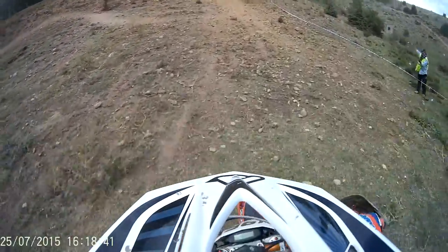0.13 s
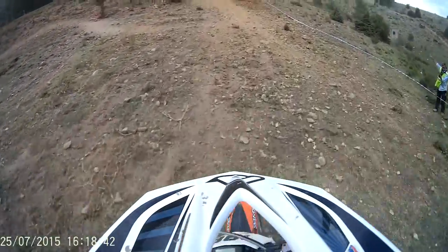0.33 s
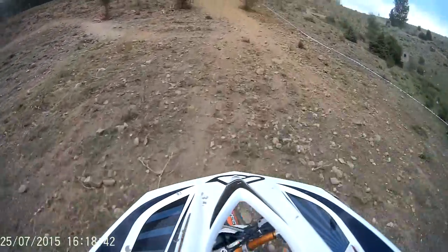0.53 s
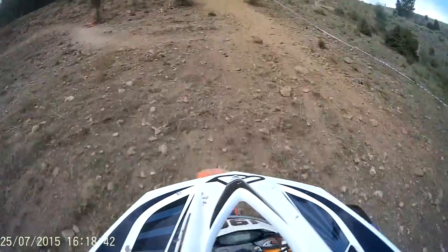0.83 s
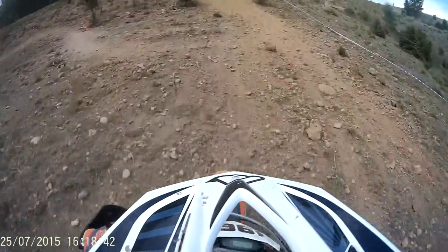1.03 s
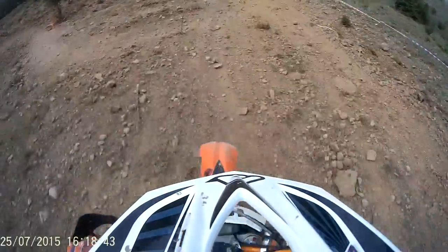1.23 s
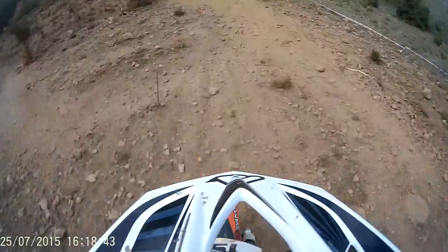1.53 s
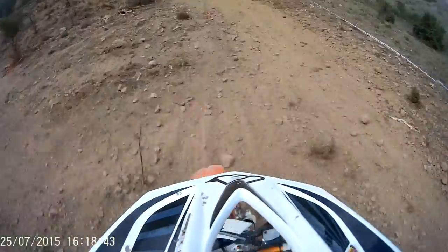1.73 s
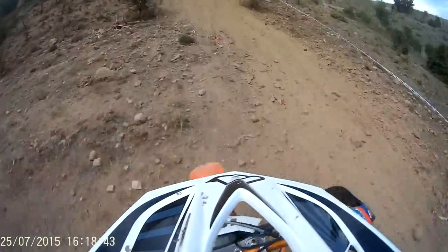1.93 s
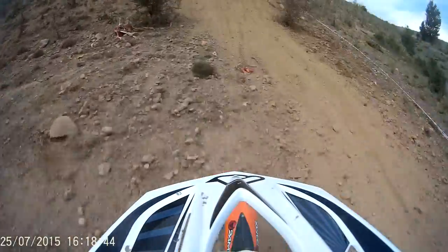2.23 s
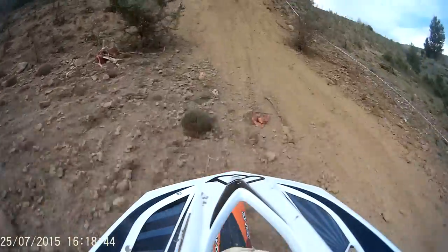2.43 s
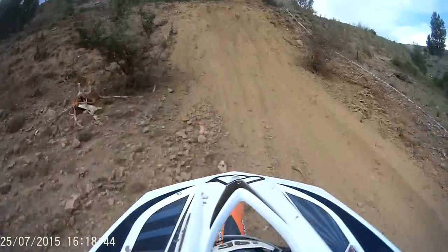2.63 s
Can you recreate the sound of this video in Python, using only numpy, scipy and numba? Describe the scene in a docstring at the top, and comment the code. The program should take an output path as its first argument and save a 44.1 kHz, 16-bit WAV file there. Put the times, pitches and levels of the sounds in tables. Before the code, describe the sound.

Two-stroke motorcycle engine buzzing low, blipping, sagging, then climbing to a loud, raspy, muffled roar

```python
"""A two-stroke enduro motorcycle drones from the first instant, then climbs a steep dirt slope in bursts of
throttle, heard from the rider's helmet. Each firing is an impulse that rings a low boom and a higher bark
in the exhaust; with the throttle shut the firings turn weak and uneven and a low burble comes forward.
Noise pulsing once a turn gives the clatter of piston and chain, and decaying sines the two chassis clacks
over stones. The muffled microphone clips the loudest peaks into a rasp."""
import sys
import numpy as np
from scipy import signal
from scipy.fft import rfft, irfft
from scipy.io import wavfile
from scipy.ndimage import uniform_filter1d
from numba import njit

SR = 44100
rng = np.random.default_rng(int(sys.argv[2]) if len(sys.argv) > 2 else 0)


def wav_out(sig):
    """Save sig, one row per channel (or a flat mono array), as 16-bit PCM at SR to the path in sys.argv[1]."""
    wavfile.write(sys.argv[1], SR, np.round(np.clip(np.atleast_2d(sig).T, -1, 1) * 32767).astype(np.int16))


N = 123479  # length in samples

# Engine speed. Each row: time in seconds, firings per second.
ENGINE_SPEED = [(0.0, 68.3), (0.035, 72.7), (0.08, 69.0), (0.26, 70.6), (0.33, 85.5), (0.44, 78.3),
                (0.49, 85.1), (0.54, 84.4), (0.61, 108.0), (0.665, 94.6), (0.73, 102.2), (0.8, 90.5),
                (0.87, 85.7), (0.95, 88.7), (1.08, 87.6), (1.15, 91.5), (1.2, 95.9), (1.25, 89.6),
                (1.32, 82.5), (1.4, 83.7), (1.45, 88.7), (1.52, 111.5), (1.57, 114.1), (1.63, 130.4),
                (1.685, 117.8), (1.76, 127.6), (1.81, 125.9), (1.9, 109.7), (2.0, 96.9), (2.09, 83.6),
                (2.15, 94.4), (2.22, 114.1), (2.28, 111.2), (2.34, 108.4), (2.4, 114.0), (2.45, 113.2),
                (2.49, 118.8), (2.54, 119.4), (2.58, 129.9), (2.66, 134.9), (2.71, 148.9), (2.8, 152.4)]
# Strength of the exhaust resonances under load. Each row: time in seconds, boom in dB, bark in dB.
EXHAUST_LOAD = [(0, -19, -19.5), (0.05, -20, -26.5), (0.1, -16.5, -24.5), (0.27, -20, -24),
                (0.33, -20.5, -19.5), (0.42, -19, -18.5), (0.46, -15, -19), (0.54, -12, -16.5),
                (0.6, -8, -12.5), (0.63, -27.5, -9.5), (0.7, -20, -15), (0.81, -23, -21), (0.9, -19.5, -21),
                (1.1, -19.5, -19.5), (1.19, -22, -16), (1.24, -24.5, -21), (1.3, -21, -21.5),
                (1.4, -19.5, -22), (1.45, -17, -13.5), (1.5, -8.5, -8.5), (1.56, -12, -8), (1.61, -15, -11),
                (1.68, -12.5, -8.5), (1.78, -10, -6), (1.82, -21, -15.5), (2.06, -18, -22.5),
                (2.1, -22, -17), (2.2, -18.5, -13.5), (2.31, -19, -12), (2.37, -7, -11),
                (2.52, -6.5, -10.5), (2.58, -11, -3), (2.67, -12, -7), (2.73, -9, -5.5), (2.79, -7.5, -3.5)]
# Centres of the exhaust resonances. Each row: time in seconds, boom in Hz, bark in Hz.
EXHAUST_CENTRES = [(0, 282.4, 634), (.22, 268.5, 659), (.36, 252, 592), (.45, 315, 630), (.54, 279, 635),
                   (.62, 291, 580), (.9, 264, 610), (1.1, 241, 595), (1.2, 295, 640), (1.4, 258, 610),
                   (1.48, 287, 623), (1.54, 291.4, 548), (1.65, 255, 568), (1.78, 263, 565),
                   (2.14, 267, 571), (2.27, 244.5, 525), (2.36, 298, 596), (2.52, 322.5, 530),
                   (2.58, 281, 527), (2.8, 278, 585)]
# Spells of weak firing; overlapping drops add. Each row: start in seconds, end in seconds, change in dB.
WEAK_SPELLS = [(0.706, 0.781, 0), (.776, 0.82, -7), (0.854, 0.871, -12), (1.246, 1.279, -11),
               (1.314, 1.33, -9.5), (1.347, 1.37, -4), (1.81, 2.024, -8.5), (2.002, 2.09, -3.5)]
# Knocks on the chassis. Each row: time in seconds, relative level in dB.
CHASSIS_KNOCKS = [(.404, -20), (.4135, -4), (.426, -12), (.434, -14), (.7823, 0), (.789, -6), (.797, -9)]
# Modes of the chassis. Each row: frequency in Hz, relative level in dB, time to decay by 60 dB in seconds.
CHASSIS_MODES = [(1523, 0, .05), (1766, -6, .04), (2046, -3, .04), (2401, -1, .045), (2580, -6, .035),
                 (3451, -15, .035), (3828, -19, .04)]
# Spectrum of unburnt gas and shaking parts. Each row: frequency in Hz, relative density in dB.
BURBLE_SPECTRUM = [(20, -26), (55, -14.5), (100, -7.5), (160, -3), (280, -4.5), (420, -8), (630, -13.5),
                   (780, -11), (1000, -27.5), (1500, -64), (20000, -100)]
# Spectrum of piston and chain. Each row: frequency in Hz, relative density in dB.
CLATTER_SPECTRUM = [(20, -30.5), (700, -28.5), (1000, -39), (1150, 2), (1400, 3), (1700, -5.5), (2050, -4),
                    (2600, -18.5), (3200, -24), (5000, -32.5), (6500, -35.5), (20000, -53.5)]
# Frequencies that the silencer holds back. Each row: centre in Hz, width in Hz.
SILENCER_DELAYS = [(611, 450), (514, 561)]
# Weak overtones of the silencer. Each row: frequency in Hz, width in Hz, level in dB.
SILENCER_OVERTONES = [(821, 140, -38.5), (1380, 110, -58.5)]

START_TURN = .75  # position in the engine's turn at the outset
# Timing and level scatter of firings at EVEN_HZ firings per second; it shrinks as the speed rises
JITTER_S, SCATTER_DB, EVEN_HZ = .00006, .7, 90
WEAK_UNEVENNESS = 5.5  # factor on both scatters during the weak spells
GAS_DB, GAS_DECAY_TURNS = -25, .4
BOOM_WIDTH_HZ, BARK_WIDTH_HZ = 135, 257  # of each band-pass stage
MUFFLE_HZ, BARK_LOW_HZ, BARK_LAG_S = 703.7, 398, 0.001707
# The thump follows a share of the bark's dB curve, plus an offset
THUMP_HZ, THUMP_WIDTH_HZ, THUMP_OFFSET_DB, THUMP_SHARE = 129, 153, -13, 0.93
GROUND_S, GROUND_DB = 0.004252, -9.5  # mean delay and level of the reflection from the slope
BOUNCE_S, BOUNCE_HZ = 0.00045, 6.07  # rms wander of that delay and its upper frequency
BURBLE_DB, BURBLE_COAST_DB = -31.5, 3  # level, and its rise in the weak spells
CLATTER_OFFSET_DB, CLATTER_SHARE = -30.5, 0.97  # offset and share of the bark's dB curve
CLATTER_STEADY, CLATTER_DECAY_TURNS = .8, .35
CLACK_DB, GRIT_DB, GRIT_DECAY_S = -28.5, -3, .007  # grit level is relative to the modes' scale
CLIP_LEVEL, HISS_DB, TOP_HZ = .71, -79.5, 15800


def amp(db):
    """The decibel law: 20 dB is a factor of ten in amplitude."""
    return 10 ** (np.asarray(db) / 20)


def curve(table, axis=1):
    """Linear interpolation of one table column in time."""
    rows = np.array(table, float)
    return np.interp(np.arange(N) / SR, rows[:, 0], rows[:, axis])


def unit(x):
    """Normalisation to a standard deviation of 1."""
    return x / np.std(x)


def running_rms(x):
    """Short-term level: the root of the power averaged twice over about 25 ms."""
    size = 1100
    power = uniform_filter1d(uniform_filter1d(x * x, size), size)
    return np.sqrt(np.abs(power) + 1e-18)


def noise(points):
    """Spectral shaping: white noise weighted by (Hz, dB) points joined on a log-frequency axis."""
    hz, db = np.array(points, float).T
    bins = np.maximum(np.fft.rfftfreq(N, 1 / SR), 1)
    weights = amp(np.interp(np.log(bins), np.log(hz), db))
    return unit(irfft(rfft(rng.standard_normal(N)) * weights, N))


def cut(x, hz, kind, order):
    """Butterworth filtering: a flat pass band with a low-pass or high-pass edge."""
    return signal.sosfilt(signal.butter(order, hz, kind, fs=SR, output="sos"), x)


@njit
def band_pass(x, hz, width):
    """State-variable filter: two integrators in feedback make a band-pass with a moving centre."""
    y, band, low = np.empty(len(x)), 0., 0.
    for i in range(len(x)):
        g, k = np.tan(np.pi * hz[i] / SR), width / hz[i]
        v = (band + g * (x[i] + 1e-18 - low)) / (1 + g * (g + k))
        band, low, y[i] = 2 * v - band, low + 2 * g * v, k * v
    return y


def resonance(x, hz, width_hz):
    """Cascaded resonance: two equal band-pass stages steepen the skirts."""
    hz = hz * np.ones(N)
    return band_pass(band_pass(x, hz, float(width_hz)), hz, float(width_hz))


def pulses(times, sizes):
    """Fractional-sample impulses: each is shared between the two neighbouring samples."""
    at = np.clip(times * SR, 0, N - 2)
    i = at.astype(int)
    fraction = at - i
    return np.bincount(i, sizes * (1 - fraction), N) + np.bincount(i + 1, sizes * fraction, N)


def firing_drop_db():
    """Stepwise weakening of combustion: the drops of all current spells add in dB."""
    t = np.arange(N) / SR
    return sum(db * ((t > start) & (t < end)) for start, end, db in WEAK_SPELLS)


def ground(x, bounce):
    """Comb interference: the direct sound plus a reflection from the slope, its delay wandering."""
    t = np.arange(N) / SR
    reflection = np.interp(t - GROUND_S - BOUNCE_S * bounce, t, x, left=0)
    return x + amp(GROUND_DB) * reflection


def boom(x):
    """Low exhaust resonance, muffled by a low-pass."""
    ringing = resonance(x, curve(EXHAUST_CENTRES, axis=1), BOOM_WIDTH_HZ)
    return cut(ringing, MUFFLE_HZ, "low", order=4)


def bark(x):
    """Higher exhaust resonance, a little late and confined to a band."""
    t = np.arange(N) / SR
    late = np.interp(t - BARK_LAG_S, t, x, left=0)
    ringing = resonance(late, curve(EXHAUST_CENTRES, axis=2), BARK_WIDTH_HZ)
    return cut(cut(ringing, MUFFLE_HZ, "low", order=8), BARK_LOW_HZ, "high", order=5)


def thump(x):
    """Bare firing pulse as a broad, low resonance at a constant frequency."""
    return resonance(x, THUMP_HZ, THUMP_WIDTH_HZ)


def silencer(x):
    """All-pass dispersion: delay varies with frequency and spreads each firing in time."""
    for hz, width in SILENCER_DELAYS:
        x = x - 2 * band_pass(x, hz * np.ones(N), float(width))
    return x


def exhaust(revs, turns, drop_db):
    """Source and resonator: one uneven pulse and puff of gas per turn excite the exhaust's resonances."""
    t = np.arange(N) / SR
    times = np.interp(np.arange(1, int(turns[-1]) + 1), turns, t)
    timing, strength = rng.standard_normal((2, len(times)))
    drop = np.interp(times, t, drop_db)
    uneven = EVEN_HZ / np.interp(times, t, revs) * np.where(drop < 0, WEAK_UNEVENNESS, 1)
    firings = pulses(times + JITTER_S * uneven * timing, amp(drop + SCATTER_DB * uneven * strength))

    puffs = np.exp(-(turns % 1) / GAS_DECAY_TURNS) * rng.standard_normal(N)
    gas = unit(puffs) * np.sqrt(revs / SR)  # keeps pace with the power of the pulse train
    bounce = unit(cut(rng.standard_normal(N), BOUNCE_HZ, "low", order=3))
    fired = ground(firings + amp(GAS_DB + drop_db) * gas, bounce)
    even = ground(pulses(times, np.ones(len(times))), bounce)

    boom_db, bark_db = curve(EXHAUST_LOAD, axis=1), curve(EXHAUST_LOAD, axis=2)
    thump_db = THUMP_SHARE * bark_db + THUMP_OFFSET_DB
    body = 0
    for ring, db in [(boom, boom_db), (bark, bark_db), (thump, thump_db)]:
        # perfectly even firing sets the level reference, so unevenness and drops stay audible
        body = body + amp(db) * ring(fired) / running_rms(ring(even))
    overtones = sum(amp(db) * unit(resonance(fired, hz, width)) for hz, width, db in SILENCER_OVERTONES)
    return silencer(cut(body + overtones, 1800, "low", order=4))


def burble(drop_db):
    """Shaped random noise: a low rough rumble that comes forward while the engine coasts."""
    coasting = uniform_filter1d(1. * (drop_db < 0), size=400)
    return noise(BURBLE_SPECTRUM) * amp(BURBLE_DB + BURBLE_COAST_DB * coasting)


def clatter(turns):
    """Amplitude modulation: mechanical noise pulses once a turn and grows with load."""
    gate = CLATTER_STEADY + np.exp(-(turns % 1) / CLATTER_DECAY_TURNS)
    pulsing = unit(noise(CLATTER_SPECTRUM) * uniform_filter1d(gate, size=60))
    return pulsing * amp(CLATTER_OFFSET_DB + CLATTER_SHARE * curve(EXHAUST_LOAD, axis=2))


def chassis():
    """Modal impact: each knock excites decaying sine modes and a short burst of grit."""
    t = np.arange(SR // 5) / SR
    ring = np.zeros(len(t))
    for hz, level, t60 in CHASSIS_MODES:
        ring += amp(level) * np.sin(2 * np.pi * hz * t) * np.exp(-np.log(1000) * t / t60)
    grit = cut(cut(rng.standard_normal(len(t)), 1400, "high", order=4), 2450, "low", order=9)
    ring = ring + amp(GRIT_DB) * unit(grit) * np.exp(-t / GRIT_DECAY_S)
    times, db = np.array(CHASSIS_KNOCKS).T
    clacks = signal.fftconvolve(pulses(times, amp(db)), ring)[:N]
    return amp(CLACK_DB) * cut(clacks, 6100, "low", order=10)


def scene():
    """Superposition of engine and chassis; integrated engine speed gives the turns."""
    revs, drop_db = curve(ENGINE_SPEED), firing_drop_db()
    turns = np.cumsum(revs) / SR + START_TURN
    bike = exhaust(revs, turns, drop_db) + burble(drop_db) + clatter(turns) + chassis()
    return bike[None]


def record(dry):
    """Non-linear distortion: the microphone clips hard, adds faint hiss and loses the top."""
    hiss = amp(HISS_DB) * rng.standard_normal(dry.shape)
    clipped = np.clip(dry, -CLIP_LEVEL, CLIP_LEVEL)
    top_filter = signal.ellip(10, .1, 80, TOP_HZ, fs=SR, output="sos")
    return signal.sosfilt(top_filter, clipped + hiss)


dry = scene()
out = record(dry)
wav_out(out)
```